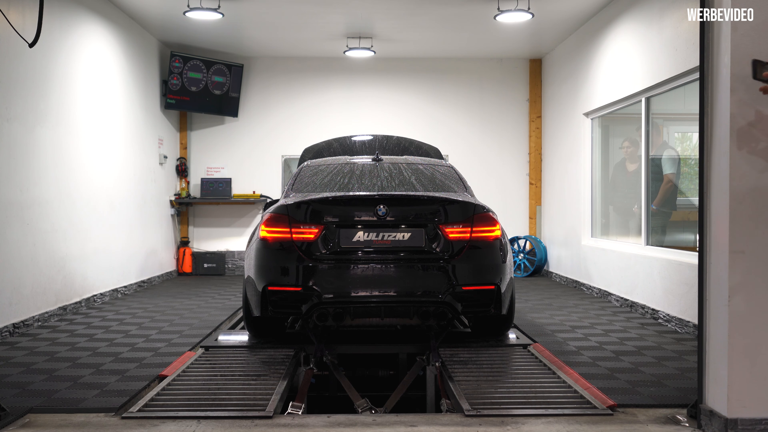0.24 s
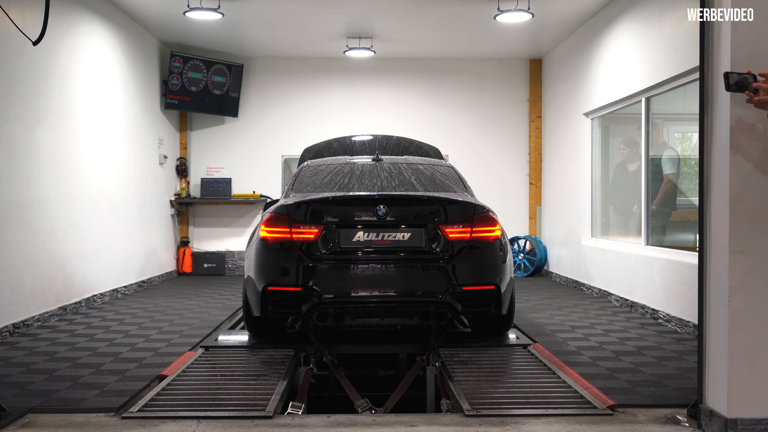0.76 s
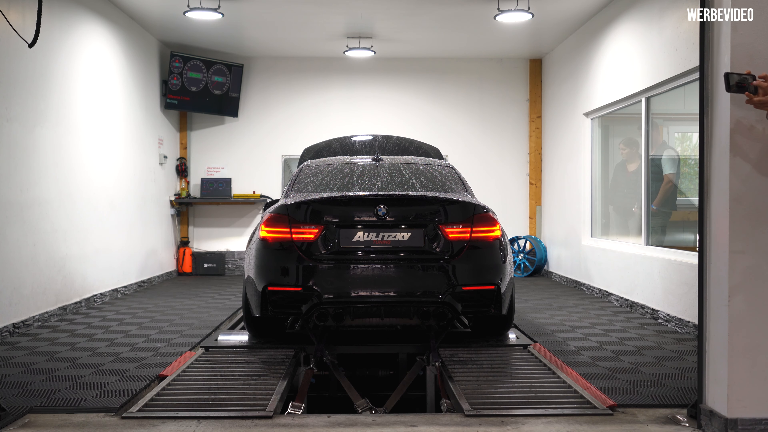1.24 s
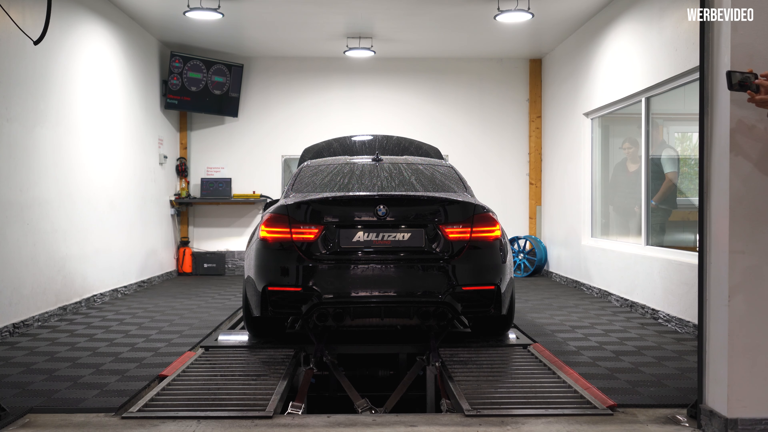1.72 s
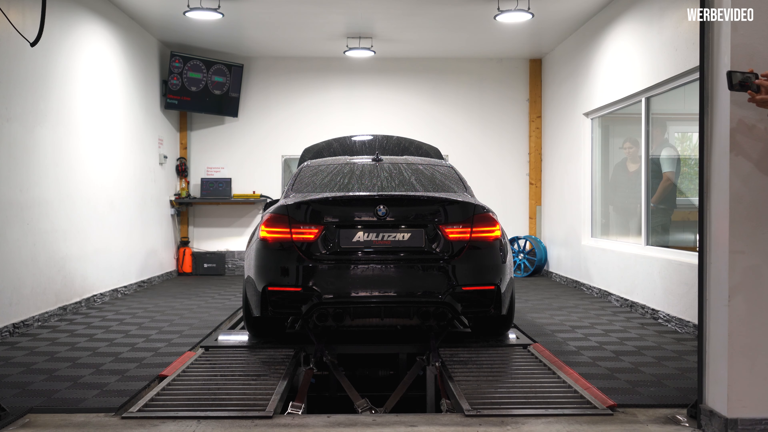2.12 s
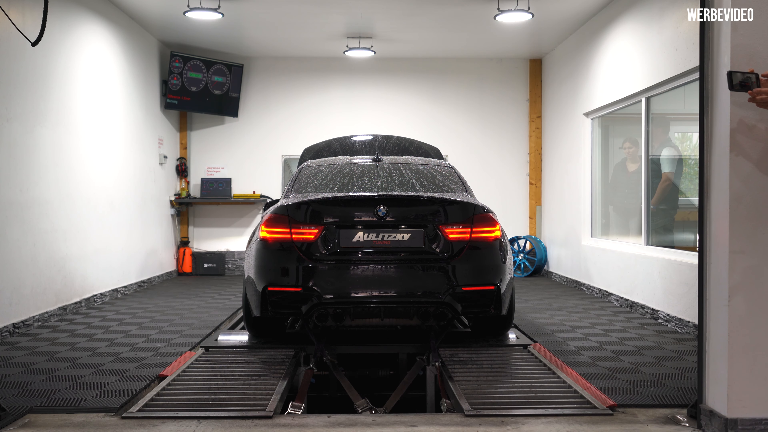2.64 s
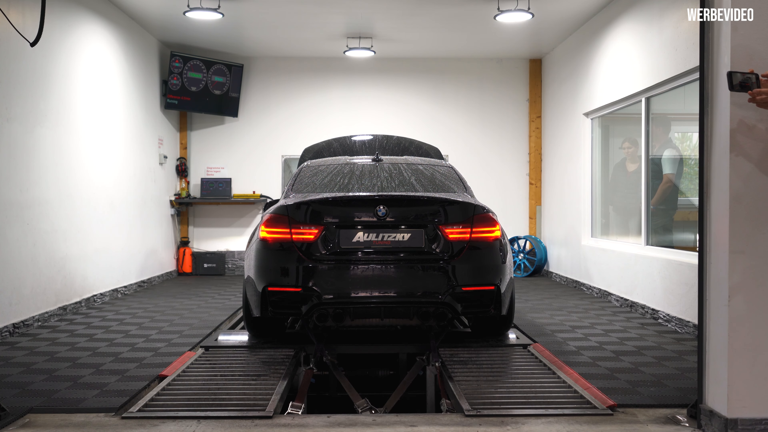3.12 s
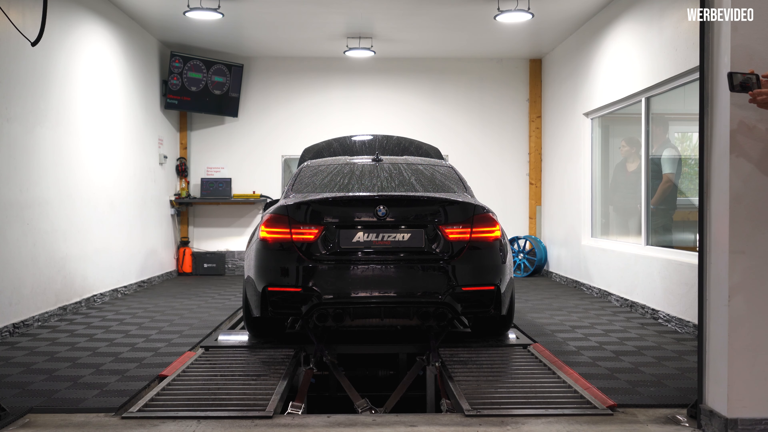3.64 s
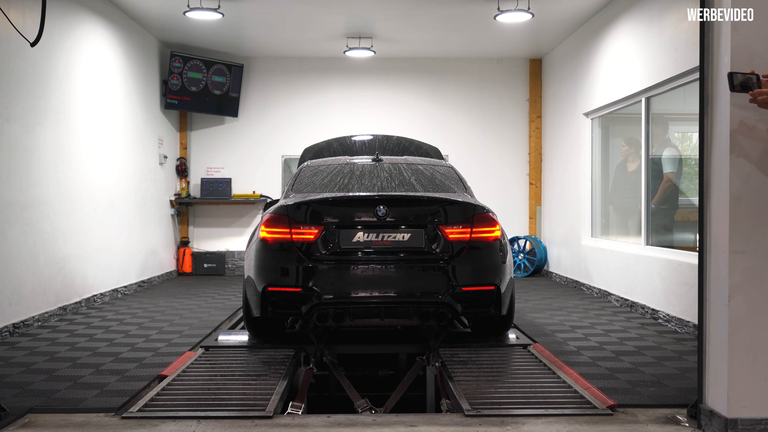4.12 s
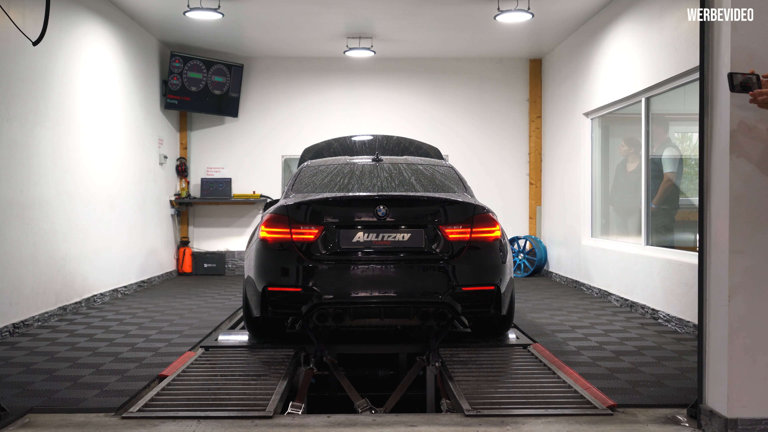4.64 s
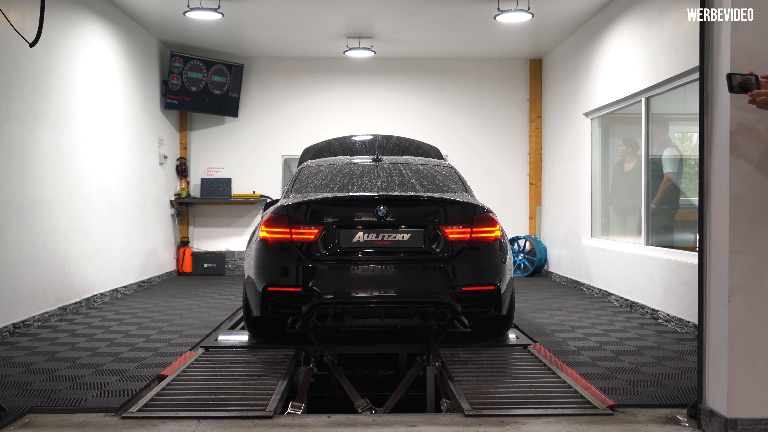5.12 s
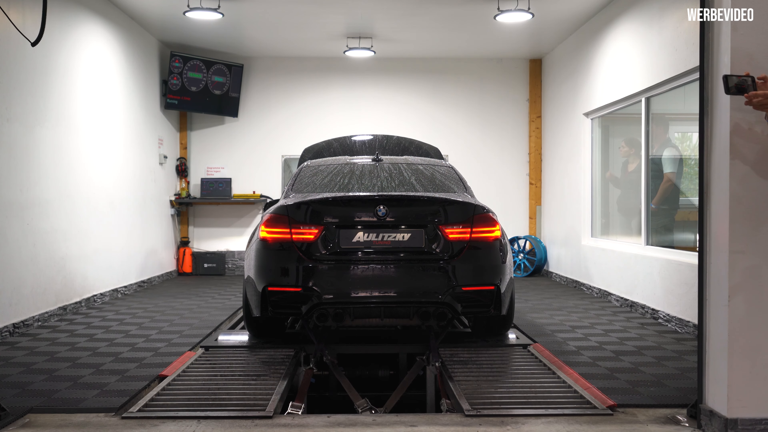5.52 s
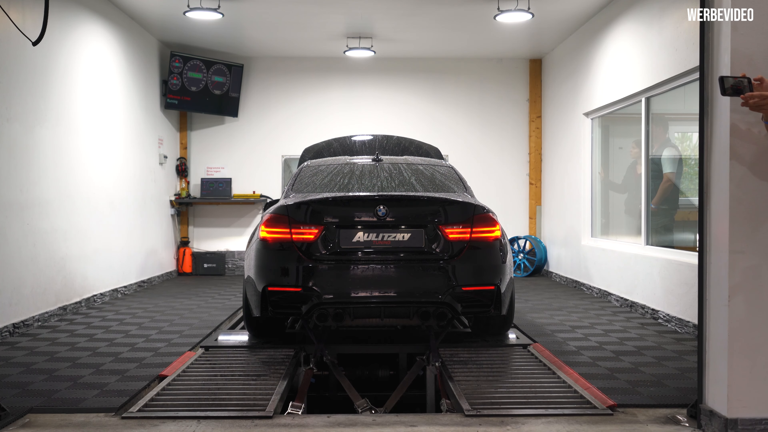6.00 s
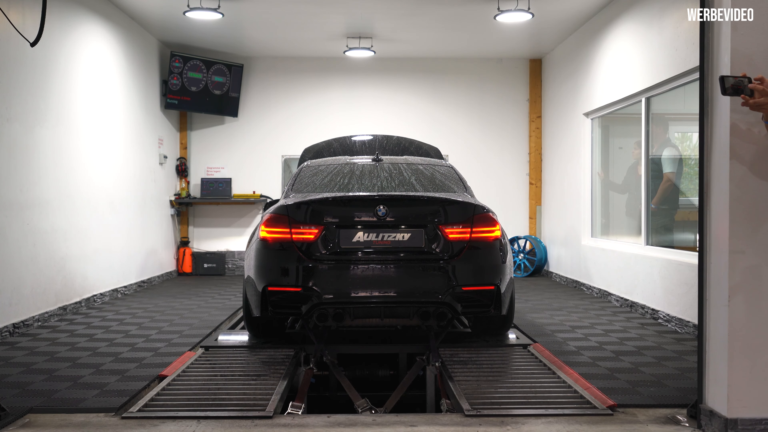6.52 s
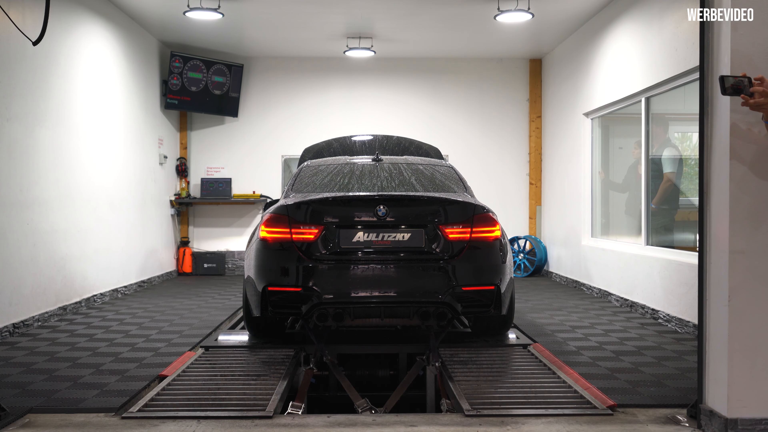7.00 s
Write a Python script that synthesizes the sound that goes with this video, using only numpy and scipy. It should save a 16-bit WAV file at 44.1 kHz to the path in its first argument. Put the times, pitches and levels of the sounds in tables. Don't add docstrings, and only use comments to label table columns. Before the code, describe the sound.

A turbocharged car engine climbs steadily through its revs on a roller dyno, exhaust droning and roaring louder and raspier in a hard-walled workshop.

```python
import sys
import numpy as np
from scipy import signal
from scipy.fft import rfft, irfft
from scipy.io import wavfile
from scipy.ndimage import uniform_filter1d, minimum_filter1d, map_coordinates

SR = 44100
rng = np.random.default_rng(int(sys.argv[2]) if len(sys.argv) > 2 else 0)


def gain_from_decibels(decibels):
    exponent = np.asarray(decibels, float) / 20
    return 10 ** exponent


def materialize(psi):
    bounded = np.clip(np.atleast_2d(psi).T, -1, 1)
    quanta = np.round(bounded * 32767).astype(np.int16)
    wavfile.write(sys.argv[1], SR, quanta)


N = 320166

# t/s, firing rate of one cylinder bank f/Hz, exhaust load level/dB
POWER_RUN = [(0.0, 47.64, 4), (0.6, 51.79, 5.5), (1.2, 56.82, 0), (1.7, 61.5, 0.6), (2.1, 65.91, -5),
             (2.4, 69.9, -5), (2.7, 74.18, 3.5), (3.2, 81.82, 2.5), (3.8, 91.08, 3), (4.4, 99.96, 1.2),
             (5.0, 109, 0.1), (5.6, 117.7, -2), (6.2, 126.7, -1.0), (6.7, 133.5, -2.8), (7.26, 140.3, -0.9)]
MID_HZ = 85


def unit(x):
    return x / np.sqrt(np.mean(x ** 2) + 1e-20)


def along(points, hz):
    f, v = np.transpose(points)
    return np.interp(np.log(hz + 1), np.log(f + 1), v)


def curves(rows):
    s, *cols = np.transpose(rows)
    return [np.interp(np.arange(N) / SR, s, c) for c in cols]


def wobble(rate):
    at = np.arange(0, N + 16, 16)
    knots = rng.standard_normal(int(N * rate / SR) + 4)
    return np.interp(np.arange(N), at, map_coordinates(knots, [at * rate / SR]))


def coloured(x, gain, rate):
    return irfft(rfft(x) * gain(np.fft.rfftfreq(len(x), 1 / rate)), len(x))


def rush(spectrum, patchy_db):
    z = signal.stft(rng.standard_normal(N + 512), nperseg=512)[2]
    patches = uniform_filter1d(rng.standard_normal(z.shape), size=5, axis=0)
    patches = uniform_filter1d(patches, size=10, axis=1)
    x = signal.istft(z * gain_from_decibels(patchy_db * unit(patches)), nperseg=512)[1]
    return unit(coloured(x, lambda hz: gain_from_decibels(along(spectrum, hz)), SR)[:N])


def tone(turns, drift, blur):
    phase = 2 * np.pi * turns + drift * wobble(3.5) + blur * wobble(24)
    return -np.sqrt(2) * np.sin(phase)


def fuzzy(turns, width_hz):
    angle = 2 * np.pi * turns
    return unit(wobble(width_hz) * np.sin(angle) + wobble(width_hz) * np.cos(angle))


def rolled(turns, gain, steps, lo_hz, hi_hz):
    pattern = coloured(rng.standard_normal(2 ** 19), gain, steps)
    heard = map_coordinates(pattern, [turns * steps])
    band = coloured(heard, lambda hz: (hz > lo_hz) * (hz < hi_hz), SR)
    return heard / np.sqrt(uniform_filter1d(band ** 2, size=SR // 2))


def engine_db(hz, mid_db, per_octave_db, bend_db, flow_share):
    # t/s, level/dB
    flow = [(0, -2), (1, -3), (1.6, -4), (2.15, -4), (2.5, 5), (2.75, 2.5), (3.0, 1), (3.5, 0), (3.85, 2.5),
            (4.3, -1), (4.7, 2), (5.3, -0.5), (5.75, -1), (6.05, 2), (6.3, 0), (6.7, -0.5), (6.9, 2),
            (7.26, 0)]
    octaves = np.log2(hz / MID_HZ)
    return mid_db + per_octave_db * octaves + bend_db * octaves ** 2 + flow_share * curves(flow)[0]


def standing():
    # f/Hz, level/dB
    pipe = [(50.0, -4), (70.0, 14), (100.0, -10.5), (140.0, 8.5), (250.0, -6), (350.0, 10.5), (500.0, -5),
            (900.0, 9.5)]
    # f/Hz, half width/Hz, level/dB
    shop_modes = [(62.5, 2.7, 9), (101.7, 1.4, 2.5), (162.4, 4.1, 6), (182, 2.1, 6.5), (211, 2.6, 7.5),
                  (229.5, 3.26, 10.5), (238.4, 5, 6), (250, 10.2, 9.5), (270.8, 1.05, 8), (278.9, 3.5, 12),
                  (311, 18.8, 7), (379, 1.6, 8), (391, 0.44, 6),
                  (434.7, 3.0, 6.3), (449.9, 15.2, 10.5), (475.4, 1.1, 6.9), (489.7, 3.0, 7.8),
                 (515.1, 4.7, 10.6), (535.2, 3.8, 7.4), (549.0, 3.3, 9.7), (561.6, 0.8, 7.7),
                 (585.1, 2.1, 6.6), (618.8, 3.0, 5.0), (639.2, 8.6, 4.4), (683.1, 7.8, 11.1),
                 (719.9, 16.0, 2.2)]
    # f/Hz, half width/Hz, level/dB
    shop_nulls = [(58, 1.6, -15.4), (72, 3.3, -18.2), (85.4, 2.8, -17), (104, 0.92, -4.5), (109, 0.89, -12),
                  (115.2, 3.5, -17), (130.7, 2.4, -14), (151.4, 6.2, -10.5), (168.3, 0.79, -17.5),
                  (178.2, 0.61, -34), (181, 1.6, -2), (198, 0.56, -14), (205.6, 1.2, -12.5),
                  (210.0, 0.73, -21), (222.4, 0.23, -13), (235.7, 1.7, -14), (257.4, 0.48, -24.5),
                  (265.1, 1.4, -7), (283.5, 15.6, -9), (298.2, 1.6, -11),
                  (313.7, 1.5, -8.2), (322.6, 2.2, -9.6), (335.0, 3.4, -5.8), (346.9, 5.2, -11.2),
                 (356.3, 2.7, -7.4), (367.9, 2.6, -2.9), (383.3, 2.3, -13.4), (402.7, 0.8, -9.2),
                 (418.1, 1.5, -7.9), (437.9, 3.6, -9.7), (453.2, 3.4, -13.3), (465.3, 1.0, -3.2),
                 (499.6, 0.7, -9.8), (576.4, 1.3, -2.3), (592.5, 1.0, -17.1), (609.0, 1.5, -16.5),
                 (652.2, 1.3, -11.5), (671.2, 2.5, -3.1), (689.5, 3.5, -14.3), (703.7, 1.5, -13.5)]
    f = np.arange(1, 3600, .25)
    db = along(pipe, f) * (f < 1500)
    for centre, width, depth_db in shop_modes + shop_nulls:
        away = (f - centre) ** 2
        lift = away + width ** 2 * gain_from_decibels(depth_db)
        base = away + width ** 2 / gain_from_decibels(depth_db)
        db = db + 10 * np.log10(lift / base)
    spacing_hz, depth = 8, 1.1
    knots = rng.standard_normal((2, 1200))
    chance = np.hypot(*[map_coordinates(k, [f / spacing_hz]) for k in knots])
    share = depth * np.clip((f - 700) / (760 - 700), 0, 1)
    chance_gain = unit(chance) ** share
    return lambda hz: np.interp(hz, f, gain_from_decibels(db)), lambda hz: np.interp(hz, f, chance_gain)


def surge(order):
    # t/s, order, spread/s, level/dB
    surges = [(0.0, 4, 0.45, 6), (0.25, 8, 0.15, 12), (0.95, 8, 0.36, -23), (1.2, 6, 0.14, 6.5),
              (1.3, 3, 0.13, 4), (1.8, 5, 0.4, -4.5), (2.25, 3, 0.11, 6.5), (2.55, 6, 0.23, -4),
              (3.45, 2, 0.25, -4), (3.45, 4, 0.23, 5), (3.55, 7, 0.15, -4), (3.75, 3, 0.25, 4.5),
              (4.55, 3, 0.19, 3.5), (4.65, 4, 0.082, -7), (5.3, 5, 0.4, -3.5), (5.35, 3, 0.29, -3.5),
              (5.35, 8, 0.32, 2), (6.5, 7, 0.22, 7), (4.2, 1, 0.18, 5.5), (6.9, 3, 0.14, 3)]
    t = np.arange(N) / SR
    return sum(db * np.exp(-.5 * ((t - s) / spread) ** 2)
               for s, k, spread, db in surges if round(k) == order)


def shop(x):
    # f/Hz, t/s
    fade = [(200, 0.63), (2000, 0.45), (10000, 0.45)]
    hz, t, z = signal.stft(rng.standard_normal(SR), SR, nperseg=256)
    decay = gain_from_decibels(-60 * t / along(fade, hz)[:, None])
    tail = signal.istft(z * decay, SR, nperseg=256)[1]
    return signal.fftconvolve(x, tail / np.linalg.norm(tail))[:N]


def exhaust(hz, turns, modes, ripple):
    # order, level at middle revs/dB, gain per octave of revs/dB, bend per octave squared/dB
    low_orders = [(1, -33, 12, -1), (2, -14, 4.5, 0.5), (3, -22, 2.6, 5.5), (4, -22.5, -1, -6.5),
                  (5, -24.5, 0.6, -4.5), (6, -32.7, -3, -10), (7, -34.5, -7.0, 0), (8, -40.5, -3, -9),
                  (9, -45.5, -1.5, 11)]
    # f/Hz, level/dB
    upper = [(480, -35.5), (900, -38), (1150, -39.5), (1290, -35), (1450, -50), (1700, -36), (1900, -49.5),
             (2300, -64), (3200, -51)]
    # order, level/dB
    uneven = [(1.335, -55), (1.667, -48), (2.333, -42), (2.667, -44.5), (3.334, -44), (3.668, -50)]
    # t/s, phase/rad
    walls = [
        (0, .12),
        (.3, .3),
        (.62, .7),
        (1.5, 1.4),
        (7.26, 1.4),
    ]
    smear, = curves(walls)
    octaves = np.log2(hz / MID_HZ)
    build_s = 0.059
    was_hz = np.interp(np.arange(N) - build_s * SR, np.arange(N), hz)

    low = 0
    for order, mid_db, gain_db, bend_db in low_orders:
        k = round(order)
        db = mid_db + gain_db * octaves + bend_db * octaves ** 2
        level = gain_from_decibels(db + surge(k) + .7 * wobble(18))
        room = modes(k * was_hz) * ripple(k * was_hz)
        low = low + level * room * tone(k * turns, smear, blur=.1)

    high = 0
    for k in range(10, 23):
        level = gain_from_decibels(along(upper, k * hz) - .5 * (k - 14))
        high = high + level * ripple(k * hz) * tone(k * turns, smear + 1.2, blur=.012 * k)

    lope = sum(gain_from_decibels(db + 1.9 * wobble(2.6)) * tone(k * turns, smear, blur=0.22) for k, db in uneven)
    lope = lope * gain_from_decibels(engine_db(hz, mid_db=-3.5, per_octave_db=11.5, bend_db=10.5, flow_share=0.5))

    low = low * gain_from_decibels(curves(POWER_RUN)[1])
    high = high * gain_from_decibels(engine_db(hz, mid_db=0.37, per_octave_db=0.98, bend_db=-0.3, flow_share=0.68))
    return low + high + lope + gain_from_decibels(-5) * shop(lope)


def gas(hz, turns):
    # f/Hz, level/dB
    roar_colour = [(60, -42), (150, -17.5), (300, -2), (500, -8), (800, -8), (1300, -10.5), (2200, -18),
                   (4000, -22), (8000, -120)]
    # f/Hz, level/dB
    rasp_colour = [(1060, -10), (1800, -0.5), (2180, -7), (2480, -3.5), (2940, -5), (3300, -0.5),
                   (3750, -1.5), (5500, -14.5), (7150, -23.5), (12100, -120)]
    puff = 1 + .14 * np.cos(2 * np.pi * turns) + .06 * np.cos(4 * np.pi * turns)
    roar_db = engine_db(hz, mid_db=-20.5, per_octave_db=3, bend_db=-1.8, flow_share=0.3)
    rasp_db = engine_db(hz, mid_db=-28.5, per_octave_db=10, bend_db=3, flow_share=0.47)
    roar = gain_from_decibels(roar_db + 0.15 * wobble(8)) * unit(puff * rush(roar_colour, patchy_db=1.46))
    rasp = gain_from_decibels(rasp_db + 0.56 * wobble(8)) * unit(puff * rush(rasp_colour, patchy_db=0.87))
    return roar + rasp


def rollers(hz):
    # f/Hz, level/dB
    rumble = [(20, -45), (50, -32), (90, -23), (140, 6), (250, 0), (450, 0.5), (900, -46)]
    db = engine_db(hz, mid_db=-28, per_octave_db=-7.5, bend_db=-1, flow_share=0.2)
    return gain_from_decibels(db + 1.1 * wobble(1.6)) * rush(rumble, patchy_db=-1.4)


def tyres(hz, turns):
    # order, width/orders, level over the bed/dB
    tread_blocks = [(47.5, 3, 2), (58.7, 1.2, 5), (70.4, 1.6, 2), (81.9, 1.8, 5.5), (96, 1.5, 4.5)]
    # order, level/dB
    bed = [(20, -33), (40, -1), (50, -1), (54, -4), (70, -7.5), (73, -11), (120, -23), (190, -25)]
    # f/Hz, level/dB
    path = [(1500, -18), (3300, -0.5), (3800, 3), (4300, -9.5), (6000, 0.5), (9000, -1), (16000, -3)]

    def pattern_gain(k):
        blocks = sum(db * np.exp(-2 * ((k - order) / width) ** 2) for order, width, db in tread_blocks)
        return gain_from_decibels(along(bed, k) + blocks)

    tread = rolled(turns, pattern_gain, steps=400, lo_hz=6000, hi_hz=9000)
    tread = coloured(tread, lambda f: gain_from_decibels(along(path, f)), SR)
    tread_db = engine_db(hz, mid_db=-47, per_octave_db=11, bend_db=3.3, flow_share=1)

    arch_hz, arch_width_hz, arch_db = 3780, 340, -42
    ring = 0
    for k, *_ in tread_blocks[1:3]:
        near = np.exp(-((k * hz - arch_hz) / arch_width_hz) ** 2)
        ring = ring + near * gain_from_decibels(arch_db + wobble(5)) * fuzzy(k * turns, width_hz=170)
    return gain_from_decibels(tread_db + 0.41 * wobble(21.0)) * tread + ring


def turbine():
    # t/s, whistle f/Hz, whistle level/dB, intake hiss level/dB
    spool = [
        (0, 6800, -140, -62),
        (1.8, 11850, -61, -52),
        (2.05, 12850, -58, -50.5),
        (2.35, 14300, -55, -50),
        (2.55, 15200, -54, -50),
        (2.72, 15620, -54.5, -50.5),
        (3.0, 15740, -64, -52),
        (3.6, 16100, -110, -55),
        (7.26, 16100, -110, -62),
    ]
    # f/thousandths of the whistle pitch, level/dB
    intake = [(200, -18), (400, -0.5), (600, -6), (800, -9.5), (1000, -14), (1060, -15), (2000, -24)]
    hz, db, hiss_db = curves(spool)
    turns = np.cumsum(hz) / SR
    hiss = rolled(turns, lambda k: gain_from_decibels(along(intake, 1000 * k)), steps=5, lo_hz=11000, hi_hz=15000)
    whistle = gain_from_decibels(db + .8 * wobble(12)) * fuzzy(turns, width_hz=420)
    return whistle + gain_from_decibels(hiss_db - 0.94 + 0.23 * wobble(8.6)) * hiss


def scene():
    hz = uniform_filter1d(curves(POWER_RUN)[0], size=SR // 10, mode="nearest")
    turns = np.cumsum(hz) / SR + .45
    modes, ripple = standing()

    def noise_room(f):
        pattern = np.log(modes(f))
        return np.exp(0.3 * (pattern - uniform_filter1d(pattern, size=400)))

    noise = coloured(gas(hz, turns) + rollers(hz), noise_room, SR)
    return (exhaust(hz, turns, modes, ripple) + noise + tyres(hz, turns) + turbine())[None]


def roll_off(x):
    return signal.sosfilt(signal.butter(12, 15710, fs=SR, output="sos"), x)


def record(dry):
    need = np.minimum(1, .975 / (np.abs(dry) + 1e-9))
    gain = uniform_filter1d(minimum_filter1d(need, size=260), size=260)
    bass_cut = lambda hz: 1 / np.sqrt(1 + (42 / (hz + 1)) ** 8)
    mix = coloured((dry * gain)[0], bass_cut, SR)[None]
    return roll_off(mix)


dry = scene()
out = record(dry)
materialize(out)
```